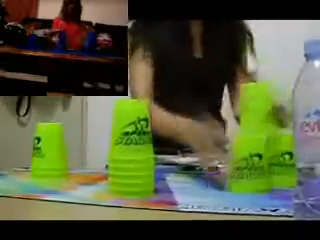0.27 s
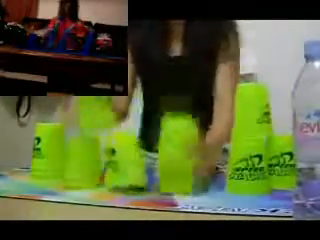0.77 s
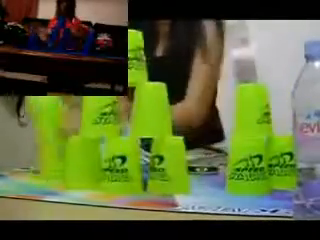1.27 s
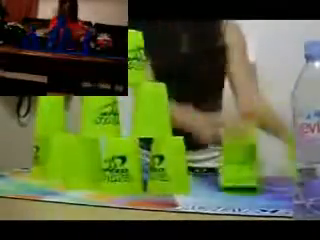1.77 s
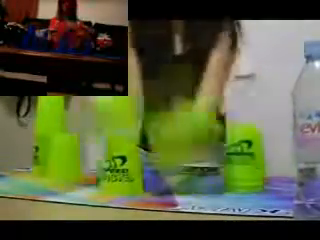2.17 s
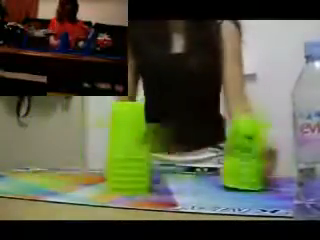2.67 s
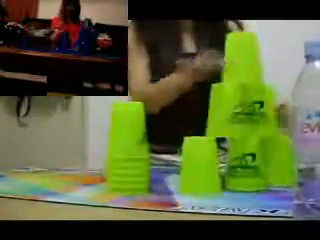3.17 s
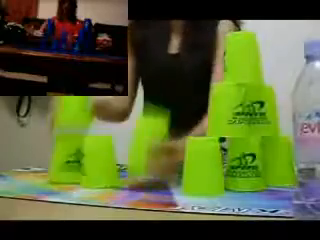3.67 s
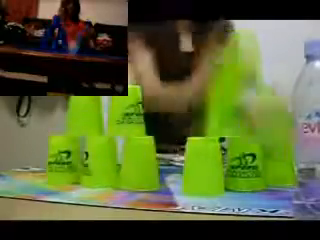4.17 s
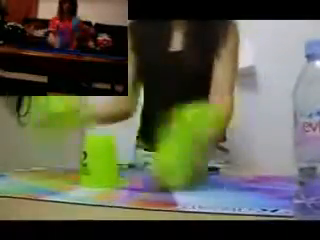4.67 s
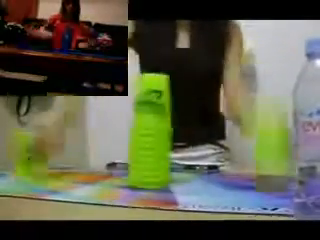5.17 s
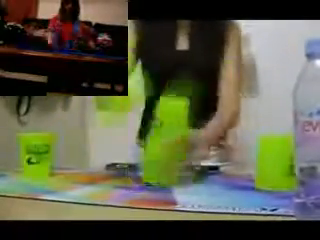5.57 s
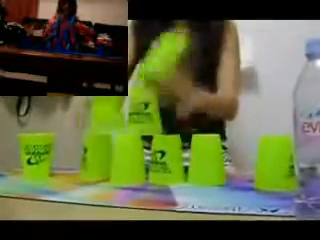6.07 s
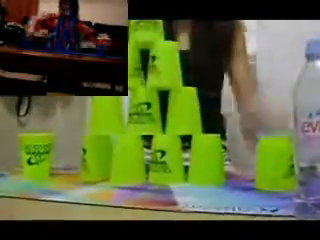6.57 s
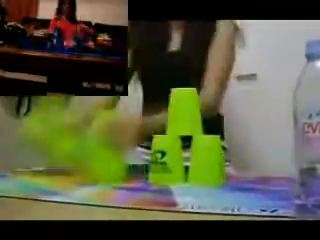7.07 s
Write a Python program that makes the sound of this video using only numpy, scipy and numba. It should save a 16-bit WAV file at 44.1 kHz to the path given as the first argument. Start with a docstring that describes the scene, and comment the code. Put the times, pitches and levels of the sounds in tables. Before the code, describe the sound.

In a small, lively room, plastic cups clatter in a rapid, irregular run as they are built up and brought down on a mat. An early loud flurry gives way to burst after burst of thin ticks, hollow pops and sliding rattles, with low knocks from the table and tiny squeaks of rubbing rims. The sound is direct and a little gritty, as through a cheap microphone, over a faint steady hush.

```python
"""Speed stacking in a bare room

Hard plastic cups go up and down at speed on a mat-covered table, heard direct and off a lively room.
Each contact ticks in the thin walls and pops the air in the cup; hard landings thud the table. A dense
clatter runs between the clear blows, and rubbing rims sing briefly. The microphone is a small camera's:
it rides its gain, overloads, samples slowly and holds each sample."""
import sys
import numpy as np
from scipy import signal
from scipy.io import wavfile
from scipy.ndimage import uniform_filter1d
from numba import njit

SR = 44100
rng = np.random.default_rng(int(sys.argv[2]) if len(sys.argv) > 2 else 0)


def master_out(mix):
    """Clip the mix to full scale and print it as 16-bit PCM to the path in sys.argv[1]."""
    frames = np.transpose(np.atleast_2d(mix))
    ceiling = np.clip(frames, -1, 1)
    pcm = np.round(ceiling * 32767).astype(np.int16)
    wavfile.write(sys.argv[1], SR, pcm)


N = 322812

# Levels in the tables are relative, taken ahead of the camera.
# clear blows: (time [s], wall tick level [dB], tick centre [Hz], air pop level [dB], pop pitch [Hz])
CUP_BLOWS = [(0.0824, -14, 1500, -50, 530), (0.2988, -6, 4830, -18, 610), (0.3204, -3.5, 1700, -14, 600),
             (0.3691, -2, 2150, -20, 540), (0.3935, -5.5, 3210, -18, 604), (0.4334, 0, 2790, -0.5, 958),
             (0.4504, -1, 5070, -6, 760), (0.5044, 3, 2410, 10, 825), (0.5244, -10, 2330, 2, 665),
             (0.5496, 18, 1490, 8.5, 1006), (0.7833, 15.5, 2070, -13, 730), (0.9044, 1, 2070, -5.5, 516),
             (0.9273, 1, 4700, -5, 784), (0.947, 1, 2020, 0, 493), (0.9556, 0, 5000, -18, 446),
             (1.055, 5.5, 5130, -3, 485), (1.073, 2, 5400, -16, 420), (1.1483, 2, 1400, -6.5, 760),
             (1.1615, 1.5, 5080, 4, 965), (1.2002, -3, 5290, -0.5, 980), (1.2701, -28, 2350, -13, 920),
             (1.4168, -17, 1550, -23.5, 420), (1.476, -12.5, 3140, -33, 970), (1.504, -8, 1660, -29, 353),
             (1.512, -5.5, 1590, -40, 520), (1.5309, -28, 1590, -17.5, 960), (1.6234, -26, 2370, -15, 563),
             (1.6728, 2.5, 2400, -7.5, 1076), (1.8821, -19, 4120, -38, 484),
             (1.9084, -17.5, 5200, -11, 955), (1.9334, -24, 2450, -7, 864), (1.9633, -0.5, 4150, -22, 507),
             (2.0173, -5, 1640, -29, 745), (2.0557, 3, 1660, -2, 906), (2.0728, 6, 2010, -18, 830),
             (2.167, -18, 3760, -13, 1080), (2.2358, -6.5, 4090, -12, 860), (2.2754, 4, 1770, -11.5, 1200),
             (2.2944, -6, 1980, -19, 1160), (2.3697, 0, 1870, -26, 1130), (2.4189, -5, 1890, -23, 816),
             (2.4729, -10, 1670, -21, 850), (2.5679, -9.5, 1980, -27, 600), (2.644, -23, 4970, -21, 890),
             (2.6883, -29, 3900, -17, 920), (2.7792, 0, 1740, -29, 1080), (2.8455, -12, 1400, -18.5, 490),
             (2.8944, -13, 1530, -19, 573), (2.917, -8.5, 1800, -35, 510), (3.0832, -9, 4710, -46, 666),
             (3.1016, -12, 5020, -30, 670), (3.1492, 5.5, 2970, -3, 650), (3.2004, -5, 3770, -9, 655),
             (3.2586, 5, 5200, 0, 990), (3.2724, 1, 2510, -4, 614), (3.3112, 4, 2420, -7, 493),
             (3.3413, -5, 4720, 2.5, 950), (3.3954, -16, 1860, -16, 1090), (3.5914, -4, 4670, -33, 454),
             (3.6023, -0.5, 1980, -29, 1130), (3.6187, 2.5, 1940, -10, 757), (3.696, -12, 1460, -20, 496),
             (3.73, -15, 4210, -44, 530), (3.8104, -6, 1600, -5, 518), (3.8217, 5, 5150, -20, 640),
             (3.8536, -5, 5300, -21, 620), (3.8979, 6, 2500, -8.5, 487), (3.918, -5, 5190, -6, 493),
             (3.941, -21, 2820, -13.5, 403), (3.9914, -3.5, 2470, -18, 404), (4.0243, -4.5, 2350, -13, 686),
             (4.0341, -10, 2440, -8, 860), (4.0758, -3, 2400, -4, 930), (4.1024, -2.5, 1980, -3, 887),
             (4.349, -8, 2370, -6, 865), (4.4218, 6, 1630, -1.5, 870), (4.4629, 7.5, 2330, -9, 1120),
             (4.563, -7, 1500, -21, 557), (4.5996, 7.5, 1580, -11, 630), (4.675, 3.5, 1580, -15, 778),
             (4.7131, -10, 1760, -3.5, 1030), (4.7396, -10, 1640, -9, 929), (4.78, -5, 4070, -8.5, 960),
             (4.798, -3, 1930, -9, 616), (4.9132, -2, 1980, -12.5, 844), (4.9596, -4.5, 1800, -30, 816),
             (5.0697, -10, 2210, -15.5, 990), (5.258, -23.5, 4300, -34, 525), (5.3518, 8, 1490, -1, 863),
             (5.3797, -0.5, 2000, -10, 483), (5.4354, -5, 1540, -7, 780), (5.4644, -7.5, 1910, -23, 885),
             (5.551, -1.5, 4860, -14.5, 501), (5.6266, 0, 4830, -13.5, 484), (5.6571, -5, 3580, -19.5, 510),
             (5.8652, -1, 5100, -6.5, 510), (5.873, -4.5, 3790, -11.5, 490), (5.9126, -10, 4960, -21, 433),
             (5.9424, -7, 4990, -10, 505), (5.9963, -6.5, 4470, -8.5, 404), (6.0264, -8, 4990, -10.5, 483),
             (6.0541, -3, 4540, -7, 541), (6.0785, 1.5, 4460, -21, 570), (6.1749, -10, 4510, -13.5, 627),
             (6.2007, 4.5, 4800, -13, 500), (6.2632, 5, 1430, -3, 950), (6.2922, 2, 4270, -9.5, 860),
             (6.317, -7, 4190, -7.5, 1010), (6.4467, -1, 4080, -9, 518), (6.5023, 0, 1740, -4.5, 947),
             (6.6149, -5.5, 1470, -17, 1140), (6.6302, -6, 5160, -7.5, 935), (6.6864, -10, 2890, -10, 930),
             (6.7361, -18, 2590, -19, 940), (6.8513, -16, 5310, -23, 500), (6.8669, -19, 4200, -24.5, 454),
             (7.013, 8.5, 1580, 1.5, 962), (7.2145, 1.5, 4490, -7, 894), (7.2846, -6, 3930, -18, 755)]
# hand moves that slide and nest cups:
# (start [s], length [s], wall level [dB], wall centre [Hz], air level [dB], air pitch [Hz])
HAND_MOVES = [(0.0, 0.57, -38.5, 2970, -36, 630), (0.321, 0.22, -18, 3000, -14, 510),
              (0.424, 0.069, -3.5, 4180, -5, 940), (0.496, 0.074, 5.5, 2800, 10, 660),
              (.55, .06, 5, 3350, 6.5, 817), (0.678, 0.037, -4.5, 4150, -4, 704),
              (.78, 0.087, -7, 2800, -8, 780), (0.91, .05, -16, 3800, -10, 606),
              (0.954, 0.12, -16, 4300, -8, 560), (1.044, 0.059, -8, 4050, -7, 510),
              (1.129, 0.098, -4.5, 3100, 0, 870), (1.27, 0.032, -35, 2700, -23.5, 910),
              (1.409, 0.039, -20.5, 1910, -28, 554), (1.526, .11, -20.5, 2430, -15, 960),
              (1.614, 0.059, -27, 2570, -20, 694), (1.666, 0.044, -13.5, 3030, -7, 900),
              (1.74, 0.058, -20.5, 2230, -25, 880), (1.858, .04, -25.5, 4200, -44, 900),
              (1.907, .06, -16, 4100, -17.5, 870), (1.98, .05, -10.5, 3800, -32, 700),
              (2.065, 0.087, -6, 2800, -14, 800), (2.176, 0.099, -13, 2960, -15, 850),
              (2.278, 0.069, -11, 2400, -12, 820), (2.395, .12, -17, 2010, -17, 800),
              (2.514, 0.049, -19, 2400, -19.5, 783), (2.627, 0.11, -17.5, 3300, -18.5, 923),
              (2.757, 0.093, -15, 2700, -23, 845), (2.852, 0.15, -24.5, 2000, -30.5, 656),
              (3.068, 0.049, -30, 4500, -32, 696), (3.16, 0.09, -13, 3400, -6, 593),
              (3.247, 0.061, -15, 3600, -4, 750), (3.314, 0.063, -3.5, 2970, 0, 870),
              (3.515, 0.063, -16.5, 3800, -24, 700), (3.614, 0.085, -28, 2500, -41, 755),
              (3.795, .09, -22, 4600, -26, 503), (3.918, 0.083, -18.5, 3400, -20, 490),
              (4.017, .06, -22, 2500, -12, 800), (4.087, 0.081, -11, 2620, -5.5, 875),
              (4.321, .02, -21, 2600, -11, 880), (4.343, 0.14, -6, 3800, -7, 880),
              (4.457, 0.12, -3.5, 2200, -9.5, 704), (4.598, 0.098, -5, 2600, -12, 690),
              (4.705, .12, -7.5, 2530, -13, 920), (4.835, 0.15, -14.5, 2320, -16.5, 800),
              (5.005, 0.16, -19.5, 2040, -18.5, 628), (5.193, 0.17, -36, 3000, -35, 760),
              (5.351, 0.082, -14, 1920, 1.5, 812), (5.525, 0.11, -17, 3700, -38, 563),
              (5.71, .12, -34, 3300, -34, 570), (5.843, 0.023, -25, 4300, -34, 506),
              (5.876, 0.056, -16, 4200, -11.5, 515), (5.965, .14, -17, 4300, -14, 517),
              (6.145, 0.047, -38, 4100, -27, 650), (6.195, 0.1, -22, 3500, -0.5, 885),
              (6.32, 0.088, -16, 3080, -8.5, 830), (6.454, 0.14, -16.5, 2600, -8.5, 834),
              (6.607, 0.086, -18, 3030, -11, 894), (6.857, 0.041, -23.5, 4360, -24, 437),
              (6.986, .02, -29, 2200, -16, 1100), (7.007, 0.069, -17, 1760, -0.5, 807),
              (7.087, 0.057, -17.5, 1660, -22, 660), (7.208, 0.096, -4.5, 3470, -6, 824)]
# stacks landing hard enough to shake the table: (time [s], top level [dB], legs level [dB])
STACK_LANDINGS = [(.084, -34, -29), (.18, -38, -30), (.3, -18.5, -32), (.36, -27, -32), (0.508, -4, -19),
                  (.68, 1, -38), (0.785, 1, -40), (0.949, 2, -36), (1.16, -45, -23), (1.416, -22.5, -44),
                  (1.499, -23, -24), (1.68, -40, -39), (1.909, -20, -24), (2.28, -22, -45),
                  (2.72, -48, -46), (3.149, -20, -30), (3.538, -7.5, -25), (3.812, -6.5, -41),
                  (3.921, -9, -50), (4.502, -8.5, -50), (4.78, -12, -45), (4.85, -33, -37),
                  (5.04, -28, -27), (5.384, -2, -38), (5.46, -10.5, -40), (5.53, -40, -11),
                  (5.867, -10, -40), (5.904, -10, -25), (5.96, -30, -18), (6.06, -13, -16),
                  (6.867, -36, -25), (7.011, -30, -34), (7.14, -16, -45), (7.215, -37, -26)]
# rims rubbing: (start [s], length [s], pitch [Hz], level [dB])
RIM_RUBS = [(1.498, 0.019, 1800, -18), (1.56, 0.017, 5050, -19), (1.878, 0.024, 4060, -17.5),
            (2.02, .1, 1760, -21), (2.285, 0.081, 4000, -15), (2.37, 0.087, 1900, -24),
            (2.57, .04, 1950, -26), (3.25, 0.053, 4100, -19), (3.596, 0.056, 1990, -19),
            (3.693, 0.034, 4300, -19), (3.99, .1, 2450, -22), (5.38, 0.043, 2020, -14),
            (6.292, 0.055, 4200, -16), (6.45, .06, 4100, -26)]
# modes of a cup's wall: (frequency [Hz], level [dB], t60 [s])
WALL_MODES = [(1570, 7, 0.0018), (1930, -3.5, 0.0055), (2450, -1.5, 0.005), (2700, -5.5, 0.0039),
              (3074, -3.5, 0.0057), (3610, -7, 0.011), (4187, 0, 0.0084), (4494, 1.5, 0.0039),
              (5056, 8, 0.0034), (5520, -6.5, 0.0044)]
# modes of the air in a cup: (multiple of the pitch [ratio], level [dB], t60 [cycles])
AIR_MODES = [(.55, 2.5, 10.4), (.78, 1.5, 10.2), (1.011, 2.5, 24.7), (1.223, 7.5, 8.4)]
# modes of the table top: (frequency [Hz], level [dB], t60 [s])
TOP_MODES = [(122, -18, 0.22), (143, -11.5, 0.1), (206.3, 2.5, 0.17), (259, -2, 0.089)]
# modes of the table's legs and frame: (frequency [Hz], level [dB], t60 [s])
LEG_MODES = [(32, -8, 0.08), (42, -9, 0.043), (73, -2.5, 0.084), (106, 0.5, 0.064)]
# reverberation of the room: (frequency [Hz], t60 [s])
ROOM_DECAY = [(100, 0.32), (400, 0.25), (1000, 0.42), (3000, 0.2), (5500, 0.25)]
# room tone at the microphone: (frequency [Hz], spectral density [dB])
ROOM_TONE_SPECTRUM = [(15, -38), (25, -39.5), (76, 11), (113, -14), (152, -19.5), (429, 17), (526, 38),
                      (5500, 42), (7150, -66), (12100, -120)]

TICK_DRIVE_DB, POP_DRIVE_DB, THUD_DRIVE_DB = -13.5, 11, -27   # from table level to strike strength
CLATTER_PER_S = 1400


def blows():
    """Clear contacts of cup on cup and cup on mat: walls tick, the air pops, the table thuds."""
    time_s, tick_db, tick_hz, pop_db, pop_hz = np.transpose(CUP_BLOWS)
    land_s, top_db, legs_db = np.transpose(STACK_LANDINGS)
    detune = held(time_s, 1 + 0.032 * rng.standard_normal(len(time_s)))
    tick_strike = rim_contact(striker(time_s, tick_db + TICK_DRIVE_DB, spread_db=0.33))
    ticks = cup_walls(held(time_s, tick_hz), detune, tick_strike, focus_db_per_octave=6.0)
    pop_strike = striker(time_s, pop_db + POP_DRIVE_DB, spread_db=0.14)
    pops = cup_air(held(time_s, pop_hz), pop_strike, focus_db_per_octave=16.5)
    top = table_ring(TOP_MODES, striker(land_s, top_db + THUD_DRIVE_DB, spread_db=2.0))
    legs = table_ring(LEG_MODES, striker(land_s, legs_db + THUD_DRIVE_DB, spread_db=2.0))
    return ticks + soften(pops, hz=1800) + soften(top + legs, hz=400)


def clatter():
    """Many small uneven contacts drive walls, air and table; the cups in hand set the colour."""
    start_s, length_s, wall_db, wall_hz, air_db, air_hz = np.transpose(HAND_MOVES)
    contacts = rng.random(N) < CLATTER_PER_S / SR
    sizes = contacts * from_db(1.55 * np.minimum(rng.exponential(1, N), 4))

    def strike():
        return sizes * rng.standard_normal(N)

    detune = np.repeat(1 + 0.06 * rng.standard_normal(N // 2000 + 1), 2000)[:N]   # a new cup every 45 ms
    rattle = cup_walls(held(start_s, wall_hz), detune, strike, focus_db_per_octave=6.0)
    hollow = soften(cup_air(held(start_s, air_hz), strike, focus_db_per_octave=-1.9), hz=1500)
    rattle_gain = swell(start_s, length_s, wall_db, attack_s=0.005, fade_db_per_s=223)
    hollow_gain = swell(start_s, length_s, air_db, attack_s=0.005, fade_db_per_s=242)
    return rattle_gain * unit_rms(rattle) + hollow_gain * unit_rms(hollow) + table_shake(strike)


def cup_walls(centre_hz, detune, strike, focus_db_per_octave):
    """Where a cup is hit and held favours the wall modes near a centre and shifts them a little."""
    tick = 0
    for hz, db, t60 in WALL_MODES:
        gain = from_db(db - focus_db_per_octave * np.abs(np.log2(hz / centre_hz)))
        tick += gain * ring(strike(), hz * detune, np.full(N, t60))
    return tick


def cup_air(pitch_hz, strike, focus_db_per_octave):
    """The hollow pop: air modes follow the free volume in the cup; a small cup radiates no bass."""
    pop = 0
    for ratio, db, cycles in AIR_MODES:
        hz = ratio * pitch_hz
        gain = from_db(db - focus_db_per_octave * abs(np.log2(ratio)))
        pop += gain * ring(strike(), hz, cycles / hz)
    return signal.sosfilt(signal.butter(2, 220, "high", fs=SR, output="sos"), pop)


def striker(time_s, db, spread_db):
    """A source of clicks at set times; each call draws new signs and slightly new strengths."""
    def strike():
        strengths = from_db(db + spread_db * rng.standard_normal(len(db)))
        clicks = np.zeros(N)
        clicks[np.round(time_s * SR).astype(int)] = strengths * rng.choice([-1, 1], len(db))
        return clicks
    return strike


def rim_contact(strike, contact_s=0.0042):
    """A rim meets point after point, spreading each click into a short rough burst."""
    decay = np.exp(-1 / (contact_s * SR))
    return lambda: signal.lfilter([1], [1, -decay], strike() + 1e-18) * rng.standard_normal(N)


def rim_rubs():
    """Friction between rims makes a single wall mode sing."""
    start_s, length_s, hz, db = np.transpose(RIM_RUBS)
    singing = ring(rng.standard_normal(N), held(start_s, hz), t60=np.full(N, 0.029))
    return swell(start_s, length_s, db, attack_s=0.0028, fade_db_per_s=400) * unit_rms(singing)


def table_ring(modes, strike):
    """The table rings at fixed modes, each struck with strengths of its own."""
    return sum(from_db(db) * ring(strike(), np.full(N, float(hz)), np.full(N, t60))
               for hz, db, t60 in modes)


def table_shake(strike):
    """Top and legs rumble after each landing and never quite rest."""
    land_s, top_db, legs_db = np.transpose(STACK_LANDINGS)
    length_s = np.full(len(land_s), 0.013)

    def shake(modes, db, fade_db_per_s, idle_db, cutoff_hz):
        gain = from_db(idle_db) + swell(land_s, length_s, db, attack_s=0.0082, fade_db_per_s=fade_db_per_s)
        return gain * unit_rms(soften(table_ring(modes, strike), cutoff_hz))

    top = shake(TOP_MODES, top_db, fade_db_per_s=350, idle_db=-44, cutoff_hz=377)
    legs = shake(LEG_MODES, legs_db, fade_db_per_s=254, idle_db=-46, cutoff_hz=202)
    return top + legs


def room_reflections(x, places=5):
    """Diffuse reflections die band by band; each place on the table has its own tail."""
    t = np.arange(SR // 2) / SR
    build_up = np.clip((t - .005) / .02, 0, 1)   # they reach the microphone 5 ms after the direct sound
    place = np.repeat(rng.integers(0, places, N // 3000 + 1), 3000)[:N]
    reflections = 0
    for k in range(places):
        tail = build_up * sum(band * from_db(-60 * t / at_hz(ROOM_DECAY, hz))
                              for hz, band in noise_bands(len(t)))
        tail /= np.sqrt(np.sum(tail ** 2))
        reflections += signal.fftconvolve(x * (place == k), tail)[:N]
    return reflections


def room_tone():
    """The steady hush of the room behind the cups."""
    return unit_rms(sum(from_db(at_hz(ROOM_TONE_SPECTRUM, hz)) * band for hz, band in noise_bands(N)))


@njit
def ring(drive, hz, t60):
    """One mode: a unit click sets a sine of height 1 ringing; the pitch may move."""
    out, last, before = np.zeros(len(drive)), 0.0, 0.0
    for i in range(len(drive)):
        decay = 1000.0 ** (-1 / (t60[i] * SR))
        angle = 2 * np.pi * hz[i] / SR
        out[i] = 2 * decay * np.cos(angle) * last - decay ** 2 * before + np.sin(angle) * drive[i] + 1e-20
        last, before = out[i], last
    return out


def soften(x, hz):
    """A soft contact passes no treble."""
    return signal.sosfilt(signal.butter(3, hz, fs=SR, output="sos"), x)


def swell(start_s, length_s, db, attack_s, fade_db_per_s):
    """Gain in time: each event rises, holds for its length and fades; powers add."""
    hop = 32
    since_s = np.arange(0, N, hop) / SR - start_s[:, None]
    rise = np.clip(since_s / attack_s, 0, 1)
    fade_db = fade_db_per_s * np.maximum(since_s - length_s[:, None], 0)
    gains = rise * from_db(db[:, None] - fade_db)
    return np.repeat(np.sqrt(np.sum(gains ** 2, axis=0)), hop)[:N]


def held(start_s, values):
    """Each event's value lasts until the next event starts."""
    latest = np.searchsorted(np.round(start_s * SR), np.arange(N), "right") - 1
    return values[np.maximum(latest, 0)]


def noise_bands(samples):
    """Yield centre frequency and signal of each half-octave band of white noise."""
    white = rng.standard_normal((2, samples))   # neighbouring bands draw on independent noise
    edges = 25 * 2 ** np.arange(0, 8.6, .5)
    for k, (low, high) in enumerate(zip(edges, edges[1:])):
        bandpass = signal.butter(2, [low, high], "band", fs=SR, output="sos")
        yield np.sqrt(low * high), signal.sosfilt(bandpass, white[k % 2])


def at_hz(points, hz):
    """Read a table on a log-frequency axis."""
    frequencies, values = np.transpose(points)
    return np.interp(np.log(hz), np.log(frequencies), values)


def from_db(db):
    """dB to gain."""
    return 10 ** (np.asarray(db) / 20)


def unit_rms(x):
    """Scale to rms 1."""
    return x / np.sqrt(np.mean(x ** 2) + 1e-20)


def gain_control(x, knee_db, attack_s, release_db_per_s):
    """Loud blows get through for a few ms before the camera's gain drops; it recovers slowly."""
    level_db = 10 * np.log10(uniform_filter1d(x ** 2, SR // 500) + 1e-12)
    over_db = np.maximum(level_db - knee_db, 0)
    release_db = release_db_per_s * np.arange(N) / SR
    cut_db = np.maximum.accumulate(over_db + release_db) - release_db
    lag = np.exp(-1 / (attack_s * SR))
    return x * from_db(-signal.lfilter([1 - lag], [1, -lag], cut_db))


def scene():
    """At the microphone, in mono: the cups direct, their reflections a little lower, and room tone."""
    clear = blows()
    dense = clatter() + rim_rubs()
    reflections = room_reflections(from_db(-4.0) * clear + from_db(-6.5) * dense)
    return (clear + dense + reflections + from_db(-38) * room_tone())[None]


def record(dry):
    """The small camera: gain control, overload, slow sampling with held samples, smoothing, steep cut."""
    hold = 4   # samples; holding mirrors the spectrum around 11 kHz
    ridden = gain_control(dry[0], knee_db=-4.5, attack_s=0.026, release_db_per_s=50.5)[None]
    anti_alias = signal.cheby2(10, 50, SR / hold * 0.691, fs=SR, output="sos")
    clipped = np.clip(signal.sosfilt(anti_alias, ridden), -.92, .92)
    stepped = np.repeat(clipped[:, ::hold], hold, axis=1)[:, :N]
    smooth = signal.sosfilt(signal.butter(1, 9000, fs=SR, output="sos"), stepped)
    smooth = signal.sosfilt(signal.butter(2, 12000, fs=SR, output="sos"), smooth)
    return signal.sosfilt(signal.ellip(10, .5, 60, 15800, fs=SR, output="sos"), smooth)


dry = scene()
out = record(dry)
master_out(out)
```